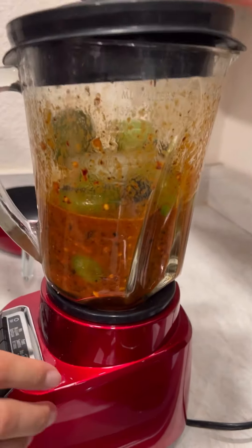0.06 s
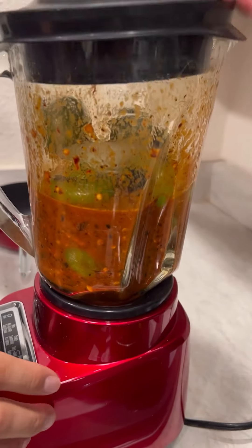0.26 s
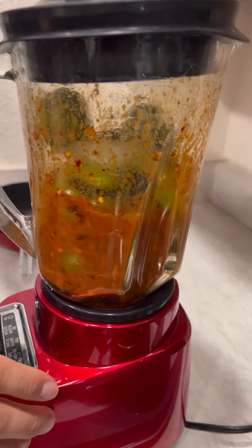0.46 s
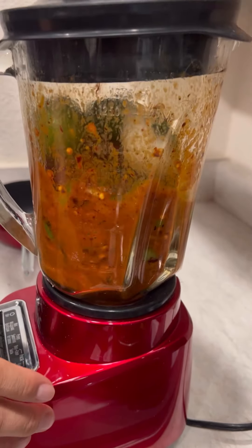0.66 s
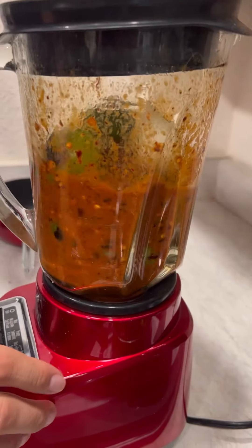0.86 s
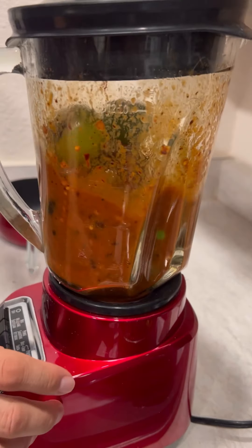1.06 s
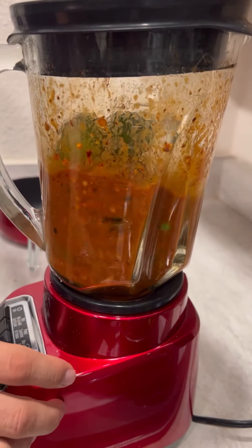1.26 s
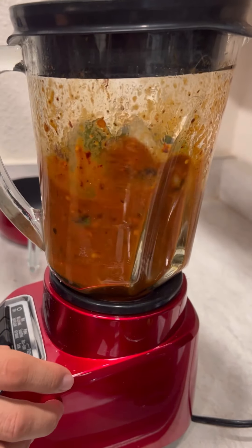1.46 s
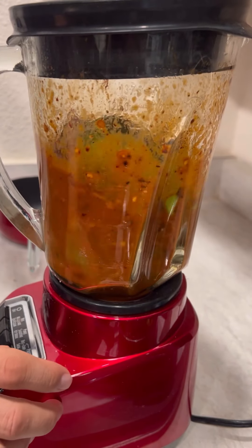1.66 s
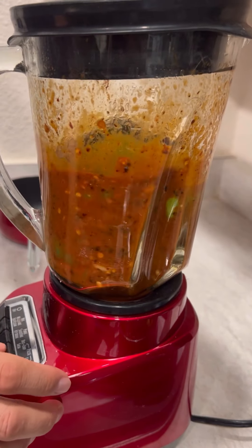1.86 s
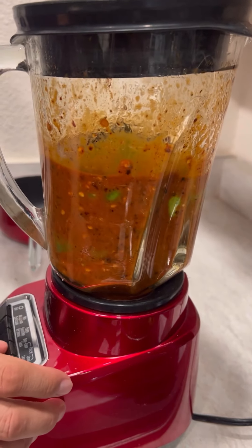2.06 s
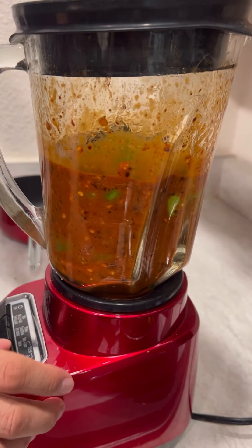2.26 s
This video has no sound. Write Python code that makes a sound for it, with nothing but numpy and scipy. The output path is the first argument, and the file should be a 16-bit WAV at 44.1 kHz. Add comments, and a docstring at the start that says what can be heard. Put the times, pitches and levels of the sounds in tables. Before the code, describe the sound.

A countertop blender, heard close in a small kitchen, churns vegetable chunks in thick sauce. The lid snaps on, a button clicks, then come two short pulses and a longer run, with knocking, crunching and a low hum.

```python
"""A small kitchen, stereo microphone close to a countertop blender. The lid clicks on, a button is
pressed, and the motor is pulsed twice, then runs a little longer. The blade batters chunks of
vegetable in sauce, ringing the jar and housing; the base hums and shakes on the counter, and the
shaft squeals each time it coasts to rest. Bass sits in the middle, treble spreads wide."""
import sys
import numpy as np
from scipy import signal
from scipy.fft import rfft, irfft, next_fast_len
from scipy.io import wavfile
from scipy.ndimage import map_coordinates

SR = 44100
rng = np.random.default_rng(int(sys.argv[2]) if len(sys.argv) > 2 else 0)


def digitize_waveform(pressure):
    """Quantize a signal to 16-bit integers and store it at the path in sys.argv[1].

    Rows of a 2-D input are taken as channels; values are limited to [-1, 1].
    """
    field = np.atleast_2d(pressure).T
    bounded = np.clip(field, -1, 1)
    quanta = np.round(bounded * 32767).astype(np.int16)
    wavfile.write(sys.argv[1], SR, quanta)


N = 101429

# motor runs: power on/s, power off/s, standstill/s, level/dB, fall while coasting/dB, squeal/dB
MOTOR_RUNS = [(0.417, 0.561, 0.8, -19, 27.5, -62.5), (.857, 0.989, 1.162, -16.5, 32, -66),
              (1.206, 1.858, 2.22, -18.5, 30, -56)]
# resonances of jar and housing: f/Hz, width/Hz, lift/dB
BODY_RESONANCES = [(309, 100, 5), (492.2, 61, 7), (823, 41, 5), (1007.3, 104, 10.5), (1233, 13, 4.5),
                   (1460, 44, 8), (1702, 86, 4), (1823, 29, 7), (2196, 45, 5.5), (3756, 77, 6),
                   (4194, 110, 3.5)]
# spectrum of a dull knock on the blender: f/Hz, level/dB
KNOCK_SPECTRUM = [(50, -28), (160, -2), (430, 6), (620, -3.5), (830, -4), (1300, -3), (2000, -4.5),
                  (3000, -21), (6000, -29), (16000, -62)]


def amp(db):
    """Decibels to amplitude."""
    return 10 ** (np.asarray(db) / 20)


def unit(x):
    """x scaled to rms 1."""
    return x / np.sqrt(np.mean(x ** 2) + 1e-20)


def along(points, hz):
    """Interpolate (f/Hz, value) points on a log frequency axis."""
    f, values = np.transpose(points)
    return np.interp(np.log(hz + 1), np.log(f + 1), values)


def curves(rows):
    """One value per sample for each column after the time."""
    times, *columns = np.transpose(rows)
    return [np.interp(np.arange(N) / SR, times, column) for column in columns]


def wobble(rate):
    """A smooth random curve, rate knots a second."""
    return map_coordinates(rng.standard_normal(int(N * rate / SR) + 4), [np.arange(N) * rate / SR])


def peak(f, hz, width):
    """A resonance curve of height 1 at hz."""
    return 1 / (1 + (2 * (f - hz) / width) ** 2)


def filtered(x, response):
    """x through a frequency response."""
    size = next_fast_len(N + SR // 2)
    return irfft(rfft(x, size) * response(np.fft.rfftfreq(size, 1 / SR)), size)[..., :N]


def coloured(x, gain_db):
    """x through a causal filter of unit power, shaped by gain_db(f)."""
    size = 2 * next_fast_len(N)
    gain = unit(amp(gain_db(np.fft.rfftfreq(size, 1 / SR))))
    cepstrum = irfft(np.log(np.maximum(gain, 1e-6)))
    cepstrum[1:size // 2] *= 2  # fold to minimum phase
    cepstrum[size // 2 + 1:] = 0
    return irfft(rfft(x, size) * np.exp(rfft(cepstrum)), size)[..., :N]


def toned(x, spectrum, resonances=()):
    """x through a spectrum and the resonances that stand on it."""
    return coloured(x, lambda f: along(spectrum, f)
                    + sum(db * peak(f, hz, width) for hz, width, db in resonances))


def bursts(rows, t60, attack_s):
    """A dying puff of noise for each (t/s, level/dB) row, as mid and side."""
    t, power = np.arange(N) / SR, np.zeros(N)
    for start, db in rows:
        age = np.maximum(t - start, 0)
        power += (amp(db - 60 * age / t60) * (1 - np.exp(-age / attack_s))) ** 2
    return np.sqrt(power) * rng.standard_normal((2, N))


def patter(rate, scatter_db, life_s, wash):
    """Uneven small impacts, rate a second, over a steady wash; rms 1, as mid and side."""
    slots = np.arange(int(rate * N / SR))
    jitter, chance = rng.random((len(slots), 2)).T
    onsets = np.minimum(((slots + jitter) * SR / rate).astype(int), N - 1)
    strength_db = scatter_db * np.minimum(-np.log(1 - chance), np.pi)
    blows = np.bincount(onsets, amp(strength_db) ** 2, N)
    power = signal.lfilter([1], [1, -np.exp(-2 / (life_s * SR))], blows)
    return unit(np.sqrt(power / power.mean() + wash) * rng.standard_normal((2, N)))


def lid():
    """Plastic snaps onto the jar's rim."""
    snaps = [(.0378, -29.5), (.0473, -33), (.0588, -19.5)]  # the lid seats: t/s, level/dB
    snap_spectrum = [(100, -6), (500, -1), (1400, -9), (2150, 2), (2700, -3.5), (3300, -7.5), (5000, -25),
                     (7000, -20.5), (10000, -48), (16000, -57)]  # f/Hz, level/dB
    return toned(bursts(snaps, t60=0.04, attack_s=0.00016), snap_spectrum)


def button():
    """The switch clicks and the push knocks and thumps the housing."""
    contacts = [(.199, -38, -48, -26), (.2064, -23.5, -42, -33), (.215, -31, -44, -26),
                (.2399, -31, -31, -23)]  # the button goes down, then a last snap and knock as it is let go: t/s, click/dB, knock/dB, thump/dB
    click_spectrum = [(100, -32), (500, -7), (1500, -6.5), (2300, -1), (3000, -9), (4000, -10), (5000, -14),
                      (8000, -17), (10000, -28.5), (16000, -35)]  # f/Hz, level/dB
    housing_modes = [(62, -2.5, 0.13), (145, 5, 0.076), (219, 7.5, 0.079)]  # f/Hz, level/dB, t60/s
    clicks = bursts([(s, db) for s, db, _, _ in contacts], t60=0.03, attack_s=0.0001)
    knocks = bursts([(s, db) for s, _, db, _ in contacts], t60=0.15, attack_s=0.00056)
    out = toned(clicks, click_spectrum) + toned(knocks, KNOCK_SPECTRUM)
    for start, _, _, thump_db in contacts:
        age = np.maximum(np.arange(N) / SR - start, 0)
        attack = 1 - np.exp(-age / 0.0062)
        for hz, db, t60 in housing_modes:
            out[0] += attack * amp(thump_db + db - 60 * age / t60) * np.sin(2 * np.pi * hz * age)
    return out


def drive():
    """Loudness follows the shaft: it gathers speed under power and coasts down without."""
    spin_up_s, spin_up_db, stop_s = 0.048, 16, 0.029
    t, gain = np.arange(N) / SR, np.zeros(N)
    for on, off, rest, db, fall_db, _ in MOTOR_RUNS:
        lag_db = spin_up_db * np.exp(-np.maximum(t - on, 0) / spin_up_s)
        coast_db = fall_db * np.maximum(t - off, 0) / (rest - off)
        turning = (t > on) * np.clip((rest - t) / stop_s, 0, 1)
        gain += amp(db - lag_db - coast_db) * turning
    return gain


def sauce():
    """Thick sauce tumbles and surges round the turning blade; air blups through it with the power off."""
    rumble_spectrum = [(15, -70), (35, -50), (70, 7.5), (95, -1.5), (135, -1.5), (162, 11), (200, -5.5),
                       (300, -9.5), (600, -45), (3000, -100)]  # the tumbling load: f/Hz, level/dB
    surges = [(0.575, 0.024, -26.5), (0.954, 0.042, -26), (1.333, 0.028, -25.5), (1.455, 0.032, -27),
              (1.583, 0.015, -18.5), (1.657, 0.012, -18), (1.705, 0.015, -19)]  # t/s, half-width/s, level/dB
    surge_spectrum = [(20, -70), (150, -37.5), (300, -11), (370, 0), (490, 3), (570, -11), (900, -37),
                      (3000, -100)]  # f/Hz, level/dB
    blups = [(0.321, 339, -37), (0.351, 217, -32.5), (.803, 283, -33), (1.113, 107, -25),
             (2.098, 103, -22.5), (2.178, 87.5, -31), (2.28, 536, -37.5)]  # air bubbles: t/s, f/Hz, level/dB
    blup_t60 = 0.092
    t, motor = np.arange(N) / SR, drive()
    tumbling = amp(-31) * (motor / motor.max()) ** 0.9  # swings a little less than the motor
    out = tumbling * toned(rng.standard_normal((2, N)), rumble_spectrum)
    swell = sum(amp(db) * np.exp(-((t - s) / width) ** 2) for s, width, db in surges)
    out += swell * toned(rng.standard_normal((2, N)), surge_spectrum)
    for start, hz, db in blups:
        age = np.maximum(t - start, 0)
        attack = 1 - np.exp(-age / 0.016)
        out += attack * amp(db + 8.5 - 60 * age / blup_t60) * np.sin(2 * np.pi * hz * age)
    return out


def base():
    """The base rocks on its rubber feet and the windings hum, both unsteadily, dead centre."""
    vibration = [(0.41, -50, -48), (0.45, -29, -30.5), (0.518, -32, -43), (0.546, -17.5, -42),
                 (0.576, -29, -29.5), (0.818, -40, -46), (1.026, -25, -25), (1.2, -41.5, -50),
                 (1.246, -28, -28.5), (1.508, -29, -18.5), (1.54, -19, -31), (1.692, -49, -21),
                 (1.754, -23.5, -41), (1.844, -24.5, -29), (1.918, -33, -35), (1.954, -20.5, -44),
                 (2.064, -39.5, -35), (2.29, -47, -61)]  # t/s, rocking/dB, mains hum/dB
    rock_hz, hum_hz = 62.3, 117
    rock_db, hum_db = curves(vibration)
    tone = lambda hz: np.sqrt(2) * np.sin(2 * np.pi * np.cumsum(hz) / SR)
    rock = amp(rock_db - 4.5 + 1.9 * wobble(25.2)) * tone(rock_hz + 7 * wobble(29.96))
    hum = amp(hum_db - 2.5 + 2.9 * wobble(25.14)) * tone(hum_hz + 6 * wobble(24.7))
    return np.array([rock + hum, np.zeros(N)])


def blade():
    """Sauce churns, pieces are chopped and crunched, and the strikes ring the jar's wall."""
    workload = [(.45, -5, -7, -17), (.57, 0.5, 3.5, 3), (.7, 0.5, -1, -6), (.88, 1, -10, -9),
                (.97, 0.5, -10, 7.5), (1.08, 5.5, 3.5, -31), (1.25, 2, 0.5, -0.5), (1.34, 0.5, 0, 3),
                (1.47, 0.5, 0.5, -1), (1.54, -1.5, -2.5, -2), (1.62, 2.5, -3, -6.5), (1.7, 2, 5, -1),
                (1.75, -4, 2.5, 4.5), (1.83, -1, 8.5, 10), (1.9, 0.5, 4, 2), (2.1, 3, -8, 0.5)]  # how hard the blade works: t/s, churn/dB, crunch/dB, jar ring/dB
    churn_spectrum = [(15, -65), (30, -40), (70, -2.5), (120, -4), (170, -1), (230, -2), (350, -0.5),
                      (520, -0.5), (720, -7), (1200, -24), (3000, -71), (8000, -100)]  # f/Hz, level/dB
    chop_spectrum = [(100, -27), (400, -5.5), (700, -2.5), (1100, 1.5), (1750, -2.5), (2300, -7.5),
                     (3100, -13.5), (4200, -13.5), (7000, -22), (10000, -33.5), (16000, -53)]  # f/Hz, level/dB
    crunch_spectrum = [(500, -25), (2000, -4), (3100, -4), (4200, 0), (6300, -1), (9700, -6), (10600, -15),
                       (14000, -21), (16000, -36)]  # f/Hz, level/dB
    wall_modes = [(2447, 40, 2.5), (2534, 78, 1.5), (2670, 122, -0.5)]  # the jar's wall: f/Hz, width/Hz, level/dB
    churn_db, crunch_db, ring_db = curves(workload)
    strikes = patter(rate=190, scatter_db=4.5, life_s=0.0028, wash=0.6)
    slaps = patter(rate=130, scatter_db=2.5, life_s=0.0077, wash=0.36)
    ticks = patter(rate=280, scatter_db=4.5, life_s=0.0012, wash=0.25)
    churn = amp(churn_db - 2) * toned(slaps, churn_spectrum, BODY_RESONANCES)
    chop = amp(-6) * toned(strikes, chop_spectrum, BODY_RESONANCES)
    crunch = amp(crunch_db - 22.5) * toned(ticks, crunch_spectrum, BODY_RESONANCES)
    wall_db = lambda f: 20 * np.log10(sum(amp(db) * peak(f, hz, width) for hz, width, db in wall_modes))
    ring = amp(ring_db - 19.5 + 2.9 * wobble(45.02)) * coloured(strikes, wall_db)
    return drive() * (churn + chop + crunch + ring)


def chunks():
    """Big pieces, hit by the blade, knock against the jar and crack; the first, loudest knock is the motor
    kicking as it starts."""
    hits = [(0.4261, -6, -19), (0.432, -23.5, -51), (0.5633, -14.5, -21), (.638, -32, -46),
            (0.666, -24, -47), (.702, -23.5, -42), (0.711, -36, -55), (.858, -23.5, -53), (0.95, -13, -30),
            (0.963, -12, -29), (.98, -17, -36), (1.015, -21, -53), (1.2067, -27, -38), (1.2457, -31, -32),
            (1.271, -23, -27), (1.301, -12.5, -32), (1.3323, -17.5, -23), (1.3877, -37, -21),
            (1.4316, -26, -24), (1.462, -29, -20), (1.474, -19, -18), (1.5934, -18, -18.5),
            (1.6348, -15.5, -17.5), (1.651, -15, -23), (1.6747, -29, -20.5), (1.711, -19, -21),
            (1.769, -9.5, -26), (1.843, -25, -18.5), (1.917, -20, -25), (1.988, -22.5, -43),
            (2.011, -23, -42), (2.082, -29, -40)]  # t/s, knock/dB, crack/dB
    crack_spectrum = [(500, -29), (2000, -5), (3100, -0.5), (4100, 5.5), (5200, -2.5), (7000, -5.5),
                      (10000, -14), (14000, -23.5), (16000, -36)]  # f/Hz, level/dB
    knocks = bursts([(s, db) for s, db, _ in hits], t60=0.046, attack_s=0.0012)
    cracks = bursts([(s, db) for s, _, db in hits], t60=0.029, attack_s=0.00091)
    return toned(knocks, KNOCK_SPECTRUM, BODY_RESONANCES) + toned(cracks, crack_spectrum, BODY_RESONANCES)


def squeal():
    """The shaft squeals in fits just before it stops, its pitch sagging ever faster."""
    partials = [(2, -9), (3, -0.5), (4, 1.5)]  # multiple of the fundamental, level/dB
    fundamental_hz, sag, length_s = 1820, 0.4, 0.093
    t, out = np.arange(N) / SR, np.zeros((2, N))
    for _, _, rest, _, _, db in MOTOR_RUNS:
        progress = np.clip(1 - (rest - t) / length_s, 0, 1)
        hz = fundamental_hz * (1 - sag * progress ** 2.3) * (1 + 0.01 * wobble(700))
        phase = 2 * np.pi * np.cumsum(hz) / SR
        arch = np.sqrt(4 * progress * (1 - progress))
        for multiple, partial_db in partials:
            out += amp(db + partial_db + 4 * wobble(160)) * arch * np.sin(multiple * phase)
    return out


def kitchen(x):
    """Counter and walls answer the mid channel; each frequency dies at its own speed."""
    decay_times = [(100, 0.3), (1000, 0.17), (4000, 0.21), (14000, 0.13)]  # f/Hz, t60/s
    hz, t, noise = signal.stft(rng.standard_normal((2, SR // 2)), SR, nperseg=256)
    tail = signal.istft(noise * amp(-60 * t / along(decay_times, hz)[:, None]), SR, nperseg=256)[1]
    return signal.fftconvolve(x[:1], tail / np.linalg.norm(tail[0]), axes=1)[:, :N]


def scene():
    """Blender and room tone at the microphone, left and right; near reflections spread the treble."""
    room_spectrum = [(25, -26), (58, 7), (110, -8), (200, -6.5), (290, -3), (420, -12.5), (600, -12.5),
                     (1000, -15), (1600, -19), (2400, -23.5), (3500, -29.5), (7500, -39.5), (10000, -52),
                     (16000, -63)]  # room tone: f/Hz, level/dB
    stereo_width = [(60, -44), (180, -41.5), (350, -25.5), (700, -13), (1400, -25), (2800, -8.5),
                    (5600, -6), (10000, -0.5), (14000, -3)]  # f/Hz, side over mid/dB
    counter_delay_s, diffuse_share = 0.0022, 0.45
    blender = blade() + chunks() + sauce() + squeal() + lid() + button()
    room_tone = amp(-45) * toned(rng.standard_normal((2, N)), room_spectrum)
    mid, diffuse = blender + amp(-12) * kitchen(blender) + base() + room_tone
    reflection = filtered(mid, lambda hz: np.exp(-2j * np.pi * hz * counter_delay_s))
    side = np.sqrt(1 - diffuse_share) * reflection + np.sqrt(diffuse_share) * diffuse
    side = filtered(side, lambda hz: amp(along(stereo_width, hz)))
    return np.array([mid + side, mid - side])


def record(dry):
    """The recorder keeps nothing above 16 kHz."""
    return filtered(dry, lambda hz: hz < 16000)


dry = scene()
out = record(dry)
digitize_waveform(out)
```